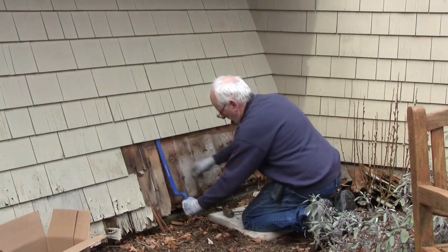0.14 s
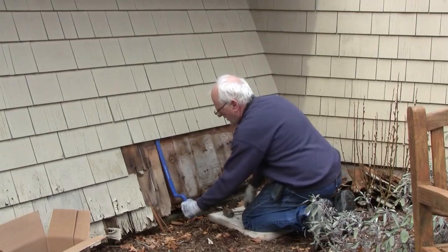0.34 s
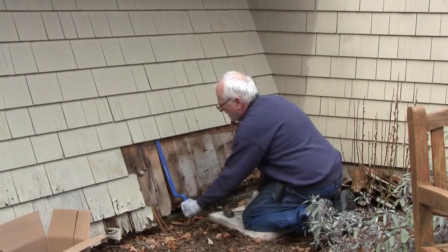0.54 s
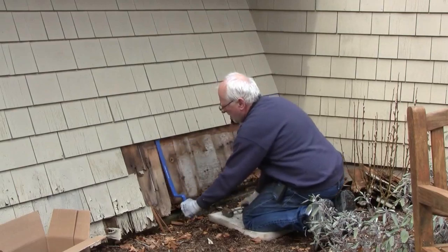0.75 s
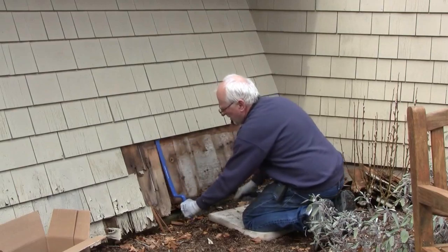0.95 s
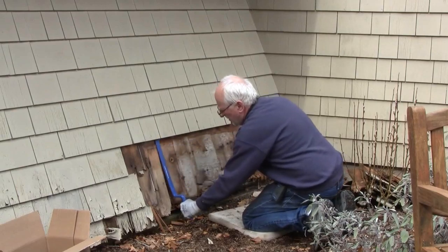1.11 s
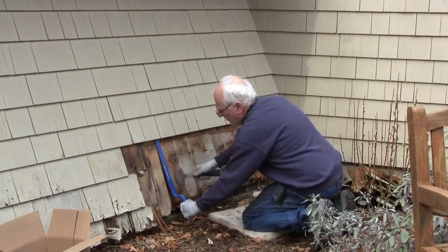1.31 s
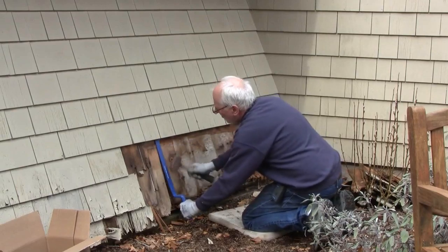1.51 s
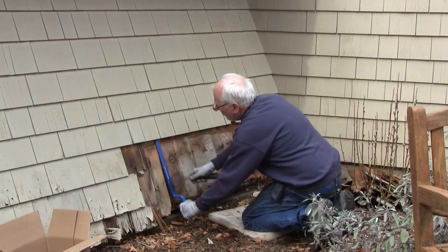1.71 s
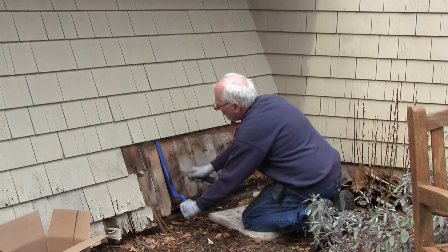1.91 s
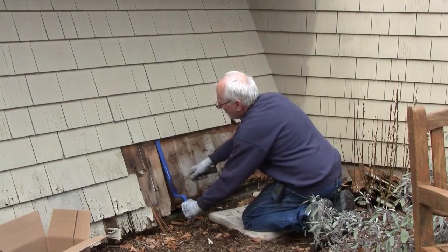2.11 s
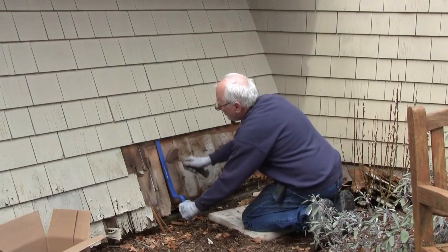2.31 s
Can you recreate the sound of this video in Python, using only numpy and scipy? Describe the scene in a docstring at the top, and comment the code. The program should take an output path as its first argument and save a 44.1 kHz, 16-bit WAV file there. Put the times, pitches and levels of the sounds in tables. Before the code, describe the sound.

Hammer striking a steel bar against wooden siding, close up outdoors. The bar bumps the boards hollowly in a crunchy cluster around 0.2-0.27 s, with weaker knocks at 0.56 and 0.88. Soft gritty scrapes and dry ticks run to about 1.1, a small tick at 1.3. Loud metallic blows crack at 1.65 and, harder, 2.03, distorting, with brief ring and dull fluttering echoes over low air, hiss and faint hum.

```python
"""Outdoors, over low air, thin hiss and a faint hum, a steel shingle remover is hooked on a nail behind siding.
First the bar bumps hollowly on the boards (ringing wall modes and short noise), with a crunch and dry ticks.
A hammer is scraped up from the ground (grains of noise). Then it strikes the bar twice: each blow cracks and
clatters (noise), shoves the wall and rings the bar (sines), then echoes (late noise) with a fluttering
after-ring (sines). Loud peaks overload the microphone."""
import sys
import numpy as np
from scipy import signal
from scipy.io import wavfile

SR = 44100
rng = np.random.default_rng(int(sys.argv[2]) if len(sys.argv) > 2 else 0)


def inscribe(sig):
    """Save sig as 16-bit PCM at rate SR to the path in sys.argv[1].

    A 1-D sig is mono; a 2-D sig holds one channel per row.
    Samples are clipped to [-1, 1] before scaling.
    """
    pcm = np.round(np.clip(np.atleast_2d(sig).T, -1, 1) * 32767)
    wavfile.write(sys.argv[1], SR, pcm.astype(np.int16))


N = 103635
TIME = np.arange(N) / SR  # seconds

# In every noise colour below, level_db_per_hz is relative: bands() evens out the total.
# In every width table, side_db is the side (left-right difference) level relative to the middle.
# A t60 is the time to fall by 60 dB. Damping is the exponent of its fall with pitch.

# Hammer blows: start_s, crack_level_db, crack_t60_s (at 1 kHz), swell_s (at 1 kHz),
# clatter_level_db, echo_level_db
BLOWS = [(1.6473, -4.5, 0.072, 0.00168, -11.5, -45.5), (2.03, 5.5, 0.0098, 0.047, -20.5, -38.5)]
# Colour of the crack: pitch_hz, level_db_per_hz
CRACK_COLOUR = [(40, -11), (250, -0.5), (600, -1), (1100, 2), (1800, -8), (4200, -5.5), (6000, -10),
                (12000, -15), (15500, -24.5)]
CRACK_HOLD_S, CRACK_DAMPING = 0.0016, 0.034
# Colour of the shingles shaken by the bar: pitch_hz, level_db_per_hz
CLATTER_COLOUR = [(40, -13), (180, -2.5), (500, -7.5), (1100, -17.5), (1800, -20.5), (4200, -19.5),
                  (7000, -33), (12000, -32), (15500, -45)]
CLATTER_T60_S, CLATTER_DAMPING = 0.12, 0.081  # t60 at 1 kHz
# The bar shoves the wall: start_s, level_db, pitch_hz, t60_s
WALL_PUSHES = [(1.6485, -3, 313, 0.023), (2.0311, 10.5, 242, 0.014)]
# Swells start this far down; the exponent makes low tones take longer to grow
SWELL_DB, SWELL_DAMPING = 38.5, 0.23

# Tones of the steel bar: pitch_hz
BAR_PITCHES = [866, 962, 1215, 1461, 2058, 2752, 3590, 4143, 4520, 5709, 6795, 8038, 8488, 10715, 13145]
# The same tones in order: t60_s, first_blow_level_db, second_blow_level_db
BAR_TONES = [(0.069, -11, -10.5), (0.02, -17, -14.5), (0.04, -3.5, -26), (0.12, -17, -43),
             (0.24, -35.5, -42.5), (.08, -21.5, -31), (0.069, -12, -36), (.07, -9, -40), (0.08, -11, -25),
             (0.21, -42, -31), (0.088, -15.5, -27), (0.14, -36, -30), (0.15, -31, -37), (0.086, -14.5, -39),
             (.08, -15, -52)]
# Quiet after-ring, one row per blow, one column per bar tone: level_db
AFTER_RING_LEVELS = [
    [-60, -58, -56, -40, -44, -62, -54, -53, -51, -70, -66, -75, -75, -80, -80],
    [-45, -44, -46, -49, -44, -50, -42, -51, -43, -45, -54, -62, -64, -70, -80],
]
AFTER_RING_T60_S, AFTER_RING_DAMPING = 1.1, 0.15  # t60 at 1 kHz
RING_WAVER_DB, TONE_WAVER_RAD = 3.5, 0.45

# Colour of the echoes: pitch_hz, level_db_per_hz
ECHO_COLOUR = [(35, 2.5), (100, -7.5), (160, 6.5), (260, -29), (450, -0.5), (620, -12), (900, 5),
               (1300, -1), (1750, -2.5), (2100, -9), (2700, -12), (4400, -9), (5500, -44), (9000, -44)]
# Stereo width of the echoes: pitch_hz, side_db
ECHO_WIDTH = [(60, -20), (110, -27), (200, -26), (380, -24), (700, -33), (1290, -49), (2380, -36),
              (4400, -23), (8120, -3), (15000, -5)]
ECHO_DELAY_S, ECHO_RISE_S, ECHO_HOLD_S = 0.096, 0.039, 0.1
ECHO_T60_S, ECHO_DAMPING = 1, 0.43  # t60 at 1 kHz

# Dull knocks on the wall: start_s, level_db, low_edge_hz, high_edge_hz
WALL_KNOCKS = [(0.0316, -14.5, 392, 670), (0.2161, -1.5, 151, 550), (0.229, 0.5, 181, 1110),
               (0.2377, 4, 200, 1210), (0.2460, -6, 128, 1030), (0.2700, -12.5, 50, 197),
               (0.37, -27.5, 90, 600), (0.431, -27.5, 117, 1520), (0.5600, -14, 233, 556),
               (0.5850, -20, 165, 191), (0.619, -26, 454, 2980), (0.8790, -18.5, 517, 1870)]
# Tones of the boarded wall: pitch_hz, level_db, t60_s
WALL_TONES = [(124.3, -18, 0.31), (185.7, -11.5, 0.26), (256, -7, 0.057), (299.4, -2, 0.064),
              (369, -2.5, .06), (425.3, -3, .06), (504, -6.5, 0.051), (698, -10.5, 0.057),
              (904, -14, 0.078), (1022, -15, 0.074)]
# Dense wood grain of a knock: pitch_hz, level_db_per_hz
WOOD_COLOUR = [(40, 5.5), (120, -0.5), (300, -8.5), (650, -12), (1200, -17), (2500, -15), (5000, -22.5),
               (15000, -52)]
WOOD_DB, WOOD_T60_S, WOOD_DAMPING = -1.5, 0.062, 0.42  # t60 at 1 kHz
KNOCK_ATTACK_S = 0.0023

# Gritty bursts, a crunch in the early knock and scraping or rustling strokes:
# peak_s, rise_s, fall_s, level_db, low_edge_hz, high_edge_hz
GRIT_BURSTS = [(.19, 0.017, 0.016, -40, 150, 700), (0.234, 0.0098, 0.019, -17, 2130, 5460),
               (.33, 0.043, 0.031, -40.5, 120, 674), (0.434, 0.035, 0.051, -34, 150, 3240),
               (0.619, 0.015, 0.066, -33, 300, 4370), (.625, 0.017, 0.024, -31.5, 1480, 2480),
               (.72, 0.043, 0.045, -48.5, 1610, 2590), (0.774, 0.026, 0.024, -32, 363, 2800),
               (0.901, 0.033, 0.029, -39, 250, 3000), (.905, 0.027, 0.016, -27, 3900, 5800),
               (1.06, 0.15, 0.091, -48.5, 600, 1870)]
# Colour of the grit: pitch_hz, level_db_per_hz
GRIT_COLOUR = [(100, -4), (220, -6.5), (480, 6.5), (850, -2.5), (1300, -16), (1800, -9), (2500, -18),
               (3300, -27), (4500, -13.5), (7000, -45.5), (12000, -20)]
GRAINS_PER_S, GRAIN_S, GRAIN_SPREAD_DB = 1000, 0.0022, 2

# Small dry ticks of grit and handling: start_s, level_db, low_edge_hz, high_edge_hz
DRY_TICKS = [(0.0890, -40, 200, 900), (0.3445, -36, 200, 3000), (0.4200, -41, 500, 6000),
             (0.6020, -36, 600, 3000), (0.6230, -31, 600, 3000), (0.7550, -34, 350, 1500),
             (0.8810, -32, 900, 4500), (1.2905, -27, 170, 2600)]
# Colour of the ticks: pitch_hz, level_db_per_hz
TICK_COLOUR = [(130, 12.5), (250, 17), (700, -3), (1600, -15.5), (4500, -11), (12000, -27)]
TICK_T60_S = 0.035

# Stereo width of all close sounds: pitch_hz, side_db
CLOSE_WIDTH = [(60, -32.5), (250, -37), (1000, -23.5), (2500, -19.5), (12000, -12)]

# Colour of the low outdoor air: pitch_hz, level_db_per_hz
AIR_COLOUR = [(25, -22.5), (60, -14.5), (110, -10.5), (200, -7), (330, -5.5), (500, -10.5), (750, -16.5),
              (1100, -26), (1700, -30.5), (3000, -44)]
# Stereo width of air and hiss: pitch_hz, side_db
AIR_WIDTH = [(60, -11), (110, -14), (200, -19), (380, -19.5), (700, -12), (1290, -5.5), (2380, -4),
             (4400, -1.5), (8120, -1.5), (15000, -5.5)]
AIR_DB, AIR_DIP_DB, AIR_DIP_AT_S, AIR_DIP_WIDTH_S = -48, 9.5, 1.853, 0.08
# Colour of the thin hiss: pitch_hz, level_db_per_hz
HISS_COLOUR = [(2000, -3.5), (4000, -2.5), (8000, 0), (12500, -2), (15500, 4)]
# Loudness of the hiss over time: time_s, level_db
HISS_LEVEL = [(0, -56.5), (.7, -52.5), (1.2, -57), (1.62, -59), (1.76, -67), (1.84, -62.5), (1.95, -57),
              (2.1, -48), (2.35, -59.5)]
# Loudness of the faint low hum over time: time_s, level_db
HUM_LEVEL = [(0, -48.5), (.6, -72), (1.1, -63.5), (1.2, -49), (1.55, -46.5), (1.7, -60), (2.35, -52)]
HUM_HZ = 105

OVERLOAD, OVERLOAD_KNEE = 0.96, 5  # peak limit; a higher knee bends more sharply
ROLLOFF_HZ, CUTOFF_HZ = 14200, 15700


def from_db(db):
    """Turn decibels into gain."""
    return 10 ** (np.asarray(db) / 20)


def at_hz(points, hz):
    """Read a pitch table between its points, on a log-frequency axis."""
    pitches, values = np.transpose(points)
    return np.interp(np.log(hz), np.log(pitches), values)


def level(points):
    """Gain over time along a (time_s, level_db) curve."""
    return from_db(np.interp(TIME, *np.transpose(points)))


def drift(rate):
    """Random wander through normal draws of spread 1, rate draws per second, joined by lines."""
    knots = rng.standard_normal(1024)
    return np.interp(TIME * rate, np.arange(len(knots)), knots)


def bands(colour, width):
    """Noise cut into about half-octave stereo bands, as (pitch, signal), with total rms about 1."""
    edges = np.geomspace(28, 16500, 20)
    centres = np.sqrt(edges[1:] * edges[:-1])
    octaves_below = np.maximum(np.log2(colour[0][0] / centres), 0)
    octaves_above = np.maximum(np.log2(centres / colour[-1][0]), 0)
    # Beyond the table, fall by 20 dB per octave
    gains = from_db(at_hz(colour, centres) - 20 * (octaves_below + octaves_above))
    gains = gains / np.sqrt(np.sum(gains ** 2 * np.diff(edges)) * 2 / SR)
    white = rng.standard_normal((2, 2, N))
    out = []
    for k, hz in enumerate(centres):
        band_filter = signal.butter(2, edges[k:k + 2], "band", fs=SR, output="sos")
        # Neighbouring bands use different noise
        mid, side = signal.sosfilt(band_filter, white[k % 2])
        stereo = mid + from_db(at_hz(width, hz)) * side * [[1], [-1]]
        out.append((hz, gains[k] * stereo))
    return out


def decay(start, t60, hold=0):
    """Sudden start, hold, then exponential fall."""
    fall_db = np.clip(60 * (TIME - start - hold) / t60, 0, 200)
    return (TIME >= start) * from_db(-fall_db)


def swell(start, rise, t60):
    """Start quietly, grow during the rise, then die away."""
    missing = np.clip(1 - (TIME - start) / rise, 0, 1)
    return decay(start, t60, rise) * from_db(-SWELL_DB * missing)


def damped(seconds, hz, damping):
    """Shorten a time given at 1 kHz for higher pitches and lengthen it for lower ones."""
    return seconds * (hz / 1000) ** -damping


def passes(hz, low_hz, high_hz):
    """Gain of a contact that mainly excites what lies between two edges."""
    return ((1 + (low_hz / hz) ** 7) * (1 + (hz / high_hz) ** 5)) ** -0.5


def clicks(times, sizes):
    """A train of single-sample impulses, with a tiny offset."""
    samples = (np.asarray(times) * SR).astype(int)
    return np.bincount(samples, sizes, N)[:N] + 1e-18


def ring(drive, hz, t60):
    """A resonance: a unit click sets off a dying sine of starting height 1."""
    shrink = from_db(-60 / (t60 * SR))
    turn = 2 * np.pi * hz / SR
    return signal.lfilter([0, np.sin(turn)], [1, -2 * shrink * np.cos(turn), shrink ** 2], drive)


def echo_rise(start):
    """Fade in the sound that comes back after the echo delay."""
    return np.clip((TIME - start - ECHO_DELAY_S) / ECHO_RISE_S, 0, 1)


def impacts():
    """Steel meets steel with a crack, shoves the wall into ringing and shakes the shingles."""
    out = np.zeros((2, N))
    for start, db, hz, t60 in WALL_PUSHES:
        out += ring(clicks([start], [from_db(db)]), hz, t60)
    crack_bands, clatter_bands = bands(CRACK_COLOUR, CLOSE_WIDTH), bands(CLATTER_COLOUR, CLOSE_WIDTH)
    for (hz, crack), (_, clatter) in zip(crack_bands, clatter_bands):
        for start, crack_db, crack_t60, rise, clatter_db, _ in BLOWS:
            crack_shape = decay(start, damped(crack_t60, hz, CRACK_DAMPING), CRACK_HOLD_S)
            clatter_t60 = damped(CLATTER_T60_S, hz, CLATTER_DAMPING)
            clatter_shape = swell(start, damped(rise, hz, SWELL_DAMPING), clatter_t60)
            out += crack * from_db(crack_db) * crack_shape
            out += clatter * from_db(clatter_db) * clatter_shape
    return out


def bar():
    """The gripped bar rings briefly; each blow favours other tones, and the second swells in late."""
    out = np.zeros(N)
    for hz, (t60, first_db, second_db) in zip(BAR_PITCHES, BAR_TONES):
        for (start, _, _, rise, _, _), db in zip(BLOWS, (first_db, second_db)):
            shape = swell(start, damped(rise, hz, SWELL_DAMPING), t60)
            tone = np.sin(2 * np.pi * (hz * TIME + rng.random()))
            out += from_db(db) * shape * tone
    return out


def after_ring():
    """The bar's tones return with the echo, lingering and fluttering in level and phase."""
    out = np.zeros(N)
    for (start, *_), levels in zip(BLOWS, AFTER_RING_LEVELS):
        for hz, db in zip(BAR_PITCHES, levels):
            gain = from_db(db + RING_WAVER_DB * drift(50.43))
            fall = decay(start, damped(AFTER_RING_T60_S, hz, AFTER_RING_DAMPING))
            tone = np.sin(2 * np.pi * hz * TIME + TONE_WAVER_RAD * drift(40))
            out += gain * echo_rise(start) * fall * tone
    return out


def echoes():
    """Each blow comes back from the surroundings as a dull wash whose highs die sooner."""
    out = np.zeros((2, N))
    for hz, noise in bands(ECHO_COLOUR, ECHO_WIDTH):
        t60 = damped(ECHO_T60_S, hz, ECHO_DAMPING)
        for start, *_, db in BLOWS:
            fall = decay(start + ECHO_DELAY_S, t60, ECHO_HOLD_S)
            out += from_db(db) * echo_rise(start) * fall * noise
    return out


def knocks():
    """Soft contacts ring the wall's low tones and a dense, quickly dying wood grain."""
    start, db, low, high = np.transpose(WALL_KNOCKS)
    out = np.zeros((2, N))
    for k, (hz, tone_db, t60) in enumerate(WALL_TONES):
        hits = clicks(start, from_db(db + tone_db) * passes(hz, low, high))
        out += (-1) ** k * ring(hits, hz, t60)  # neighbouring tones start in opposite directions
    soft = np.exp(-1 / (KNOCK_ATTACK_S * SR))
    for hz, noise in bands(WOOD_COLOUR, CLOSE_WIDTH):
        # Energy is squared amplitude, hence 120 here for a 60 dB fall
        keep = from_db(-120 / (damped(WOOD_T60_S, hz, WOOD_DAMPING) * SR))
        hit_energy = (from_db(db + WOOD_DB) * passes(hz, low, high)) ** 2
        energy = signal.lfilter([1], [1, -keep], clicks(start, hit_energy))
        out += signal.lfilter([1 - soft], [1, -soft], np.sqrt(energy)) * noise
    return out


def grit():
    """Short bursts of dense grit: a crunch in the loud early knock, then scraping and rustling strokes."""
    grain_db = GRAIN_SPREAD_DB * np.minimum(rng.exponential(1, N), 4)
    grains = (rng.random(N) < GRAINS_PER_S / SR) * from_db(grain_db)
    keep = np.exp(-1 / (GRAIN_S * SR))
    energy = signal.lfilter([1], [1, -keep], grains ** 2 + 1e-18)
    roughness = np.sqrt(energy / energy.mean())
    bursts = []
    for peak, rise, fall, db, low, high in GRIT_BURSTS:
        distance = (TIME - peak) / np.where(TIME < peak, rise, fall)
        bell = np.exp(-np.minimum(distance ** 2 / 2, 20))
        bursts.append((from_db(db) * bell, low, high))
    out = np.zeros((2, N))
    for hz, noise in bands(GRIT_COLOUR, CLOSE_WIDTH):
        out += noise * sum(shape * passes(hz, low, high) for shape, low, high in bursts)
    return roughness * out


def ticks():
    """Brief dry bursts of noise that start suddenly and die quickly."""
    shapes = [(from_db(db) * decay(start, TICK_T60_S), low, high) for start, db, low, high in DRY_TICKS]
    out = np.zeros((2, N))
    for hz, noise in bands(TICK_COLOUR, CLOSE_WIDTH):
        out += noise * sum(shape * passes(hz, low, high) for shape, low, high in shapes)
    return out


def background():
    """Low air and thin hiss, both noise dipping after the first blow, and a faint wavering sine hum."""
    dip_db = AIR_DIP_DB * np.exp(-((TIME - AIR_DIP_AT_S) / AIR_DIP_WIDTH_S) ** 2)
    air = from_db(AIR_DB - dip_db) * sum(noise for _, noise in bands(AIR_COLOUR, AIR_WIDTH))
    hiss = level(HISS_LEVEL) * sum(noise for _, noise in bands(HISS_COLOUR, AIR_WIDTH))
    hum_tone = np.sin(2 * np.pi * HUM_HZ * TIME + 0.5 * drift(6.35))
    hum = level(HUM_LEVEL) * np.sqrt(2) * hum_tone  # root 2 makes the level an rms level
    return air + hiss + hum


def scene():
    """Add all sources together, from the blows to the background."""
    blows = impacts() + bar() + after_ring() + echoes()
    handling = knocks() + grit() + ticks()
    return blows + handling + background()


def record(dry):
    """Loud peaks are flattened; the top is softened by a gentle low-pass, then a steep one."""
    overload = np.abs(dry / OVERLOAD) ** OVERLOAD_KNEE
    clipped = dry / (1 + overload) ** (1 / OVERLOAD_KNEE)
    dulled = signal.sosfilt(signal.butter(4, ROLLOFF_HZ, fs=SR, output="sos"), clipped)
    return signal.sosfilt(signal.ellip(12, 0.05, 80, CUTOFF_HZ, fs=SR, output="sos"), dulled)


dry = scene()
out = record(dry)
inscribe(out)
```